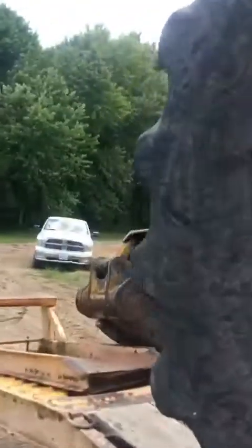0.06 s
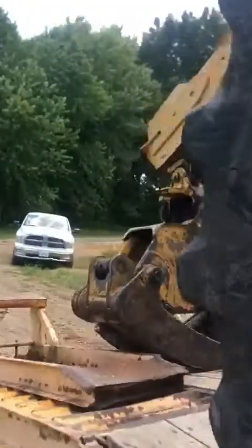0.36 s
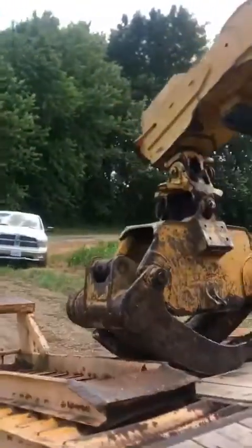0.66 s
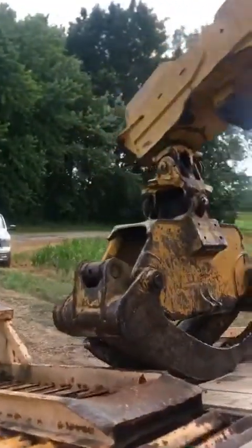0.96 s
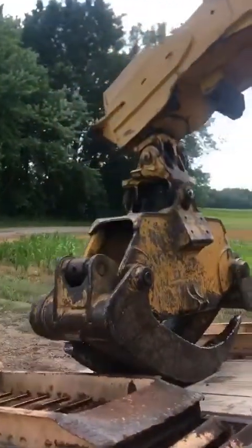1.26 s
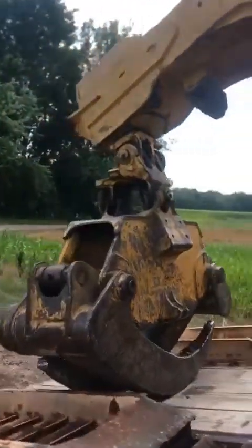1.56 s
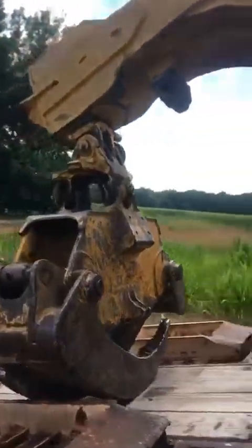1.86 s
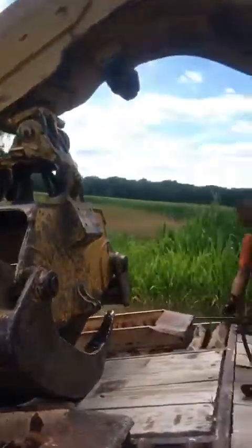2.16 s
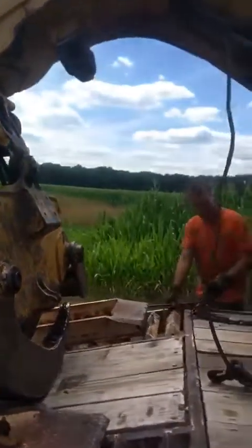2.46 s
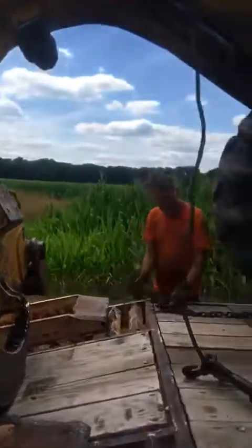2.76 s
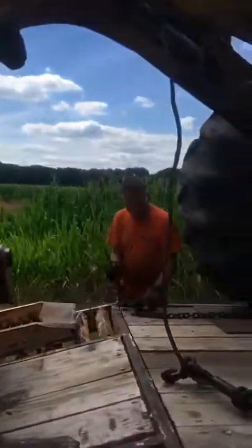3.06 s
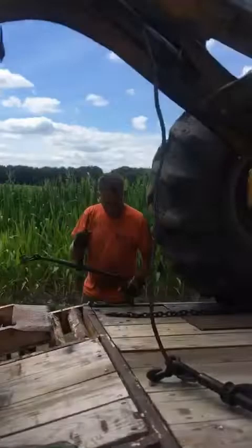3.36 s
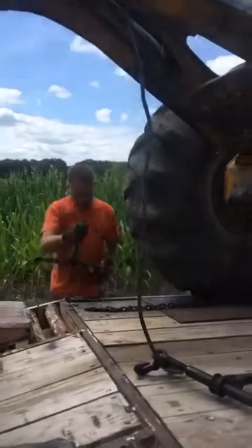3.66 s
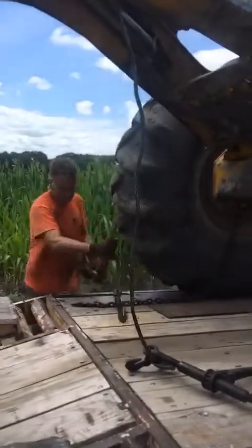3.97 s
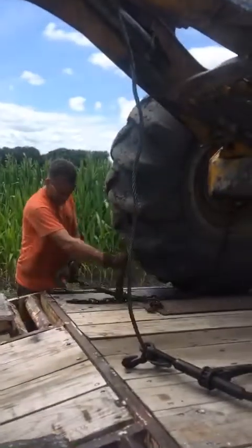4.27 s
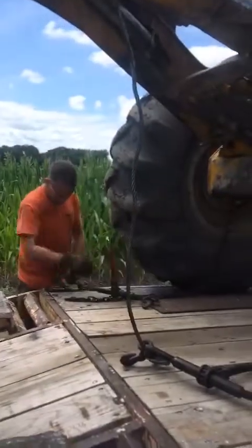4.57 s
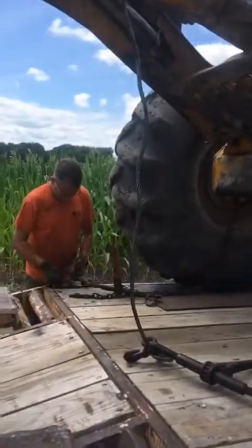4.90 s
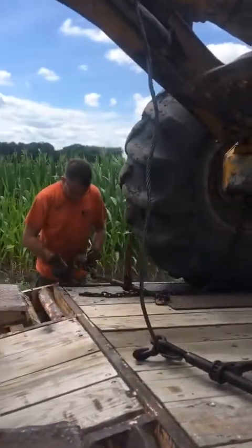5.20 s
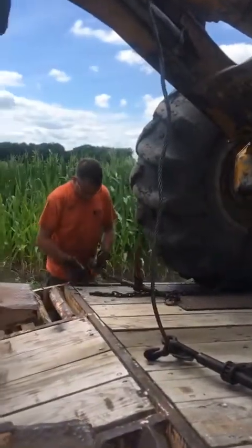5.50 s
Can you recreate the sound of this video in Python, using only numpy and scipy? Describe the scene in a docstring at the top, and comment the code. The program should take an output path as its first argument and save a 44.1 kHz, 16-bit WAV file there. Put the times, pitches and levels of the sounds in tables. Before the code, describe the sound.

A steel chain scrapes in short tugs across a steel-framed wooden trailer deck, with light clinks and knocks. After a sharper clank and a faint bird twitter, heavy clanks and bright link pings follow as wind buffets the microphone harder. Near the end a chain binder lands and rings. Leaves hiss softly outdoors, and cloth rustles briefly close by.

```python
"""Outdoors, over a hiss of leaves, a breeze rumbles at the microphone and a steel chain starts to scrape
across a steel-framed wooden trailer deck by stick-slip friction. Blows clank through the frame, rubs boom
in the planks, single links ping in their free modes, and cloth rustles close by. From about 3.5 s a small
bird twitters far off; then the gusts buffet harder and the heaviest blows fall. Near 5.5 s the chain
binder lands and rings."""
import sys
import numpy as np
from scipy import signal
from scipy.fft import rfft, irfft
from scipy.io import wavfile
from scipy.ndimage import uniform_filter1d

SR = 44100
rng = np.random.default_rng(int(sys.argv[2]) if len(sys.argv) > 2 else 0)


def waveform_to_disk(signal):
    """Save audio, clipped to [-1, 1], as 16-bit WAV at the path in sys.argv[1]."""
    frames = np.transpose(np.atleast_2d(signal))
    scaled = np.clip(frames, -1, 1) * 32767
    samples = np.round(scaled).astype(np.int16)
    wavfile.write(sys.argv[1], SR, samples)


N = 248724
TIME = np.arange(N) / SR


def amp(db):
    """Amplitude ratio of a level in decibels."""
    return 10 ** (np.asarray(db) / 20)


def unit(x):
    """Normalisation to rms 1."""
    return x / np.sqrt(np.mean(x ** 2) + 1e-20)


def read(points, hz):
    """Interpolation on a logarithmic frequency axis."""
    f, value = np.transpose(points)
    return np.interp(np.log(hz + 1), np.log(f + 1), value)


def add(mix, s, sound):
    """Superposition of a sound starting at time s."""
    part = mix[max(round(s * SR), 0):][:len(sound)]
    part += sound[:len(part)]


def colour(x, spectrum):
    """Zero-phase filtering by a table of f/Hz, gain/dB."""
    return irfft(rfft(x) * amp(read(spectrum, np.fft.rfftfreq(len(x), 1 / SR))), len(x))


def wander(rate_hz):
    """Slow random modulation: low-pass noise of rms 1."""
    hz = np.fft.rfftfreq(N, 1 / SR)
    return unit(irfft(rfft(rng.standard_normal(N)) / (1 + (hz / rate_hz) ** 4), N))


def smooth_noise(count, span):
    """Noise of rms 1, correlated over span points by a moving average."""
    return unit(uniform_filter1d(rng.standard_normal(count), size=span))


def swells(rows):
    """Raised-cosine envelopes; incoherent sources add in power."""
    return np.sqrt(sum((amp(db) * np.cos(np.pi * np.clip((TIME - s) / length, -.5, .5)) ** 2) ** 2
                       for s, length, db in rows))


def ring(modes, t, weight_db=0):
    """Free vibration: a sum of damped normal modes, with unit initial power."""
    hz, db, t60 = np.transpose(modes)[:, :, None]
    size = amp(db + weight_db)
    waves = size * np.sin(2 * np.pi * (hz * t + rng.random(hz.shape))) * np.exp(-np.log(1000) * t / t60)
    return waves.sum(0) / np.sqrt(np.sum(size ** 2) / 2)


def grains(per_s, spread_db):
    """Shot noise: a Poisson train of tiny contacts, a few much larger than the rest."""
    size = amp(spread_db * np.minimum(rng.exponential(1, N), 4))
    return unit(size * rng.choice([-1, 1], N) * (rng.random(N) < per_s / SR))


# spectrum of distant foliage: f/Hz, density/dB
FOLIAGE_SPECTRUM = [(59, -34), (100, -4), (251, -20), (426, -21), (830, -19), (915, -21), (7020, -30.5),
                    (9420, -33), (10200, -50.5), (10800, -76.5), (14000, -106), (22000, -120)]

def foliage(level_db=-56):
    """Countless distant leaves and corn stalks sum incoherently to a gently wavering hiss."""
    hiss = unit(colour(rng.standard_normal(N), FOLIAGE_SPECTRUM))
    return amp(level_db + wander(rate_hz=1.8)) * hiss


def eddies(spectrum, evenness):
    """Turbulent pressure: noise with its envelope partly levelled, so that it keeps swinging."""
    pressure = unit(colour(rng.standard_normal(N), spectrum))
    power = uniform_filter1d(abs(signal.hilbert(pressure)) ** 2, size=2200)
    return unit(pressure / power ** (evenness / 2))


# spectra of the large and of the fine eddies: f/Hz, density/dB
RUMBLE_SPECTRUM = [(15, -40), (28, -25), (42, 1), (62, 2), (90, -0.5), (130, -10.5), (200, -34.5),
                   (400, -73.5)]
FLUTTER_SPECTRUM = [(70, -6), (130, 3), (180, 1), (260, -3.5), (370, -13.5), (500, -22.5), (700, -22.5),
                    (1500, -48.5), (4000, -75.5)]
# breeze between gusts: t/s, level/dB
BREEZE_LEVELS = [(0, -47.5), (.9, -44), (1.55, -43.5), (2.05, -37.5), (2.8, -44.5), (3.8, -34),
                 (4.4, -26.5), (4.85, -25), (5.12, -32.5), (5.4, -23), (5.64, -24.5)]
# share of fine eddies in the breeze: breeze level/dB, flutter re rumble/dB
FLUTTER_SHARE = [(-49.5, -14), (-43.5, -7), (-41, -18), (-23.5, -1), (-20.5, -7.5)]
# gusts on top of the breeze: crest t/s, duration/s, level/dB, flutter re rumble/dB
WIND_GUSTS = [(.4, 0.2, -33, -17), (.66, .12, -29.5, -15), (0.838, 0.18, -31, -8.5), (1.058, 0.12, -46, 1),
              (1.201, 0.041, -34.5, -6.5), (1.792, 0.43, -32, -9), (1.944, 0.14, -29.5, -6),
              (2.15, 0.33, -36.5, -10), (2.513, 0.081, -29, -13), (2.966, 0.15, -36.5, -9),
              (3.12, 0.15, -32, -10), (3.305, 0.12, -34.5, -8), (3.432, 0.12, -27.5, -24),
              (3.608, 0.16, -31, -38), (3.823, 0.041, -22, -33), (3.891, 0.036, -23, -3),
              (4.007, 0.091, -17, -3.5), (4.082, 0.13, -17, -2.5), (4.217, 0.056, -19.5, -6.5),
              (4.303, 0.037, -21.5, 1), (4.433, 0.16, -18.5, -2), (4.511, 0.092, -23, 3.5),
              (4.614, 0.096, -18, -3.5), (4.747, 0.11, -26, -0.5), (4.842, 0.093, -23, -10),
              (5.264, 0.17, -22.5, -18.5), (5.44, 0.22, -16.5, -8)]
# sudden slaps of wind: t/s, level/dB, f/Hz
WIND_SLAPS = [(.795, -17.5, 65.4), (3.401, -20, 130), (3.941, -10, 155.4), (3.997, -7.5, 130),
              (4.483, -3.5, 270.5), (4.507, -11, 294), (4.589, -11, 251), (4.609, -12.5, 214),
              (4.727, -16, 257), (4.764, -9.5, 135.6), (4.835, -14, 127), (5.218, -12.5, 215),
              (5.374, -14.5, 252), (5.404, -10.5, 331), (5.416, -12.5, 89), (5.43, -8.5, 325)]

def wind():
    """Turbulence at the microphone: large eddies rumble, fine ones flutter, single swings slap."""
    rumble = eddies(RUMBLE_SPECTRUM, evenness=0.72)
    # fine turbulence bursts on the crests of the slow pressure swings
    bursts = amp(2 * wander(rate_hz=31) + 2 * np.clip(rumble, -2, 2))
    flutter = unit(eddies(FLUTTER_SPECTRUM, evenness=0.83) * bursts)
    breeze_db = np.interp(TIME, *np.transpose(BREEZE_LEVELS))
    breeze = amp(breeze_db + 1.5 * wander(rate_hz=22))
    fine_breeze = breeze * amp(np.interp(breeze_db, *np.transpose(FLUTTER_SHARE)))
    gusts = swells([(s, length, db) for s, length, db, _ in WIND_GUSTS])
    fine_gusts = swells([(s, length, db + fine_db) for s, length, db, fine_db in WIND_GUSTS])
    out = rumble * np.hypot(breeze, gusts) + flutter * np.hypot(fine_breeze, fine_gusts)
    for s, db, hz in WIND_SLAPS:
        cycles = np.arange(0, 4, hz / SR)
        puff_spectrum = [(hz, -6), (hz * 2, 0), (hz * 4, -12), (hz * 12, -45)]
        puff = unit(colour(rng.standard_normal(len(cycles)), puff_spectrum))
        envelope = (cycles / 0.63) ** 2 * np.exp(2 - 2 * cycles / 0.58)
        add(out, s, amp(db) * envelope * (np.sin(2 * np.pi * cycles) + amp(-17) * puff))
    return colour(out, [(15, -19), (24, -7), (40, 1.5)])  # the microphone sheds the deepest bass


def tugs(rows, rise_s=0.065, fade_db_per_s=115):
    """Envelope of pulled motion: a linear rise, a hold, then exponential decay to rest."""
    power = np.zeros(N)
    for s, held, db in rows:
        attack = np.clip(1 + (TIME - s) / rise_s, 0, 1)
        coasting_s = np.maximum(TIME - s - held, 0)
        power += (attack * amp(db - fade_db_per_s * coasting_s)) ** 2
    return np.sqrt(power)


# normal modes of the steel frame: f/Hz, level/dB, T60/s
FRAME_MODES = [(483, 1.5, 0.46), (558, -21.5, 0.35), (870, 2, 0.46), (1083, -12.5, 0.54), (1180, 2, 0.34),
               (1296, -2.5, 0.55), (1480, 0.5, 0.29), (1803, -2.5, 0.52), (1958, 6.5, 0.33),
               (2090, -16.5, 0.3), (2300, 5, 0.43), (2390, -11.5, 0.13), (2720, -1, 0.34),
               (2990, -3.5, 0.27), (3436, 1.5, 0.17), (3540, -1.5, 0.38), (4000, -8, 0.3), (4280, -17, .25),
               (5700, 0, 0.21), (5700, -7.5, 0.22)]

def slide(effort, surface, gain_db, frame_db=-13, links=6):
    """Stick-slip friction: each link repeats its own knock at random and faintly excites the frame."""
    out, t = np.zeros(N), np.arange(SR // 3) / SR
    pull = amp(3 * wander(rate_hz=11)) * tugs(effort)
    for _ in range(links):
        contact = rng.standard_normal(len(t)) * np.exp(-t / .004)
        knock = colour(np.roll(contact, SR // 500), surface)
        frame = ring(FRAME_MODES, t)
        response = knock / np.linalg.norm(knock) + amp(frame_db) * frame / np.linalg.norm(frame)
        out += signal.oaconvolve(grains(per_s=130, spread_db=1.5) * pull, response)[:N]
    return amp(gain_db) * out / np.sqrt(links)


# tugs and slack creep along the steel edge, then over the planks: t/s, hold/s, level/dB
EDGE_TUGS = [(.28, 0.064, -57), (.56, 0.01, -46.5), (.72, 0.018, -51.5), (.82, .1, -47.5),
             (1.06, 0.16, -51), (1.34, 0.04, -44.5), (1.48, 0.018, -51), (1.6, 0.079, -53),
             (1.73, 0.14, -45.5), (1.84, 0.0085, -38)]
EDGE_CREEP = [(.1, 2.25, -58)]
PLANK_TUGS = [(2.47, 0.018, -44), (2.62, 0.036, -50), (2.73, 0.071, -47), (2.9, 0.067, -56),
              (3.08, 0.025, -38), (3.2, 0.046, -53)]
PLANK_CREEP = [(2.57, 0.7, -54)]
# spectra of a link slipping on each surface: f/Hz, density/dB
EDGE_SPECTRUM = [(150, 13), (290, 8.5), (550, -4), (850, 2), (1100, -5.5), (1750, -3), (2600, -10.5),
                 (4000, -17.5), (6000, -20), (9500, -24), (11000, -48)]
PLANK_SPECTRUM = [(150, -9.5), (330, 8.5), (460, 0.5), (780, 2.5), (1200, -9.5), (1800, -9), (2600, -12),
                  (4000, -16), (6000, -23.5), (9500, -25), (11000, -47)]

def drag():
    """Source and filter: the surface under the dragged chain, steel and then wood, colours its friction."""
    on_steel = slide(EDGE_TUGS + EDGE_CREEP, EDGE_SPECTRUM, gain_db=2)
    on_wood = slide(PLANK_TUGS + PLANK_CREEP, PLANK_SPECTRUM, gain_db=-0.5)
    return on_steel + on_wood


# broad resonances of the deck and rails: f/Hz, bandwidth/Hz, gain/dB
DECK_RESONANCES = [(557, 79, 5.5), (1080, 260, 2), (1310, 110, -0.5), (1890, 290, 5.5), (2320, 89, 3.5),
                   (2534, 100, 6), (3120, 330, 3), (3790, 360, 6), (4170, 380, 5.5), (4450, 100, 2),
                   (5900, 1100, 5)]

def deck(x, ripple_db=3):
    """Forced response of the deck: each driving point favours some frequencies over others."""
    hz = np.fft.rfftfreq(len(x), 1 / SR)
    peaks_db = sum(db / (1 + (2 * (hz - centre) / width) ** 2) for centre, width, db in DECK_RESONANCES)
    place_db = ripple_db * smooth_noise(len(hz), span=110)
    log_gain = np.log(amp(peaks_db + place_db))
    # minimum phase: the resonances ring after the blow
    response = np.exp(np.conj(signal.hilbert(np.r_[log_gain, log_gain[-2:0:-1]])))
    return irfft(rfft(x) * response[:len(hz)], len(x))


# decay time of the whole trailer: f/Hz, T60/s
TRAILER_DECAY = [(100, 0.13), (600, 0.77), (1400, 0.93), (2800, 0.43), (5000, 0.21), (10000, 0.17)]

def trailer_tail(count):
    """Densely overlapping modes act as noise whose decay rate depends on frequency."""
    hz, t, bands = signal.stft(rng.standard_normal(count), SR, nperseg=256)
    decay = np.exp(-np.log(1000) * t / read(TRAILER_DECAY, hz)[:, None])
    return signal.istft(bands * decay, SR, nperseg=256)[1][:count]


# spectrum of a blow: f/Hz, density/dB
BLOW_SPECTRUM = [(60, -5.5), (200, 1.5), (600, 5.5), (1300, 6), (1700, -0.5), (2700, 1.5), (4000, -4.5),
                 (6000, -5), (7500, -5.5), (9700, -15.5), (11000, -41)]

def clank(treble_db, thud_db, chatter_t60, ring_db, crack_s=0.0019, rise_s=0.003):
    """Impact excitation: a hard crack and a chatter of settling links, with the trailer ringing on."""
    t = np.arange(2 ** 15) / SR
    crack = np.exp(-t / crack_s)
    chatter = np.exp(-np.log(1000) * t / chatter_t60)
    contact = rng.standard_normal(len(t)) * (crack + chatter)
    blow = deck(colour(contact + amp(ring_db) * trailer_tail(len(t)), BLOW_SPECTRUM))
    onset_rms = np.sqrt(np.mean(blow[:SR // 70] ** 2))
    frame = ring(FRAME_MODES, t, weight_db=7 * rng.standard_normal((len(FRAME_MODES), 1)))
    # steel on steel is bright, steel on wood is dull
    hardness = [(500, thud_db), (1600, 0.013), (3200, 0.018), (7000, 1.05 * treble_db), (10000, treble_db)]
    sound = colour(blow / onset_rms + amp(ring_db - 3) * frame, hardness)
    return sound * np.minimum(t / rise_s, 1) * (1 - t / t[-1])


# blows on the trailer: t/s, level/dB, treble/dB, plank thud/dB, chatter T60/s, ring/dB
CHAIN_BLOWS = [(.265, -48, 5, 8, 0.13, -7), (.713, -38, -28, -5, 0.098, -5.5),
               (.799, -35.5, 2, 4, 0.065, -13), (1.033, -29.5, -11, -1, 0.19, -3.5),
               (1.33, -36.5, 5, 1, 0.78, 0), (1.472, -27, -14, -9.5, 0.24, -12),
               (1.735, -30, -12, -33, .1, -9), (1.851, -22, -11, -2.5, 0.22, -12),
               (2.047, -38, 5, 5.5, 0.11, -14), (2.384, -36.5, -9, -10, 0.043, -20),
               (2.459, -32, -12, 2.5, 0.25, -7), (2.73, -33.5, -26, 8.5, 0.11, -11),
               (2.908, -36, -9, 11.5, 0.17, -17), (3.057, -29.5, -14, -26, 1, -15),
               (3.097, -15.5, 0.5, -33, 0.11, -25), (3.317, -31, 12.5, -34, 0.049, -10.5),
               (3.386, -41, 2.5, -10, 0.5, -9), (3.425, -46, -8, 11, 0.26, -23),
               (3.906, -39, 9, 3, 0.083, -8), (3.951, -31, 5.5, -3, 0.13, -13.5),
               (4.078, -28.5, 22, 22, 0.19, -6.5), (4.134, -22.5, 8, 1.5, 0.084, -30),
               (4.254, -6, 0, -2, 0.28, -7), (4.265, -4, -16, 1, .14, -13.5),
               (4.291, -6.5, -7, -4.5, .34, -11), (4.325, .5, 0.5, -2, .11, -31),
               (4.418, -14, -10, -6, 0.089, -29), (4.425, -13, -4.5, -1, 0.066, -33),
               (4.451, -19.5, -23, 3, 0.079, -21), (4.552, -27, -28, 1, 0.06, -27),
               (4.761, -26.5, -11, 4, .11, -7.5), (4.791, -31.5, -31, 11.5, 0.22, -6),
               (4.844, -21, -11.5, 9, 0.12, -24), (4.934, -19.5, -4.5, -17, 0.29, 1),
               (4.955, -13, -15.5, -9.5, 0.27, -2), (5.135, -30.5, -36.5, 8.5, 0.16, -15),
               (5.165, -9, -15.5, -4, 0.088, -16), (5.458, -9, 5.5, -7, .17, -9),
               (5.464, -0.5, 4, -12, 0.38, -8), (5.491, -16.5, 4, -6, 0.029, 0.5)]

def clanks(gain_db=-8):
    """Chain and hook strike the trailer, and the responses superpose linearly."""
    out = np.zeros(N)
    for s, db, *touch in CHAIN_BLOWS:
        add(out, s - .001, amp(db + gain_db) * clank(*touch))
    return out


# dull rubs on the planks: t/s, level/dB, f/Hz, duration/s
PLANK_SCUFFS = [(0.521, -43.5, 646, 0.078), (.556, -34.5, 347, .098), (0.89, -45.5, 1730, 0.044),
                (1.027, -43.5, 460, 0.03), (1.794, -43.5, 450, 0.21), (2.905, -44, 796, 0.049),
                (3.424, -39, 1080, .017), (3.471, -51, 1810, 0.013), (3.874, -45.5, 1500, 0.038),
                (3.926, -41, 1400, 0.014), (4.073, -19.5, 755, .034), (4.438, -29.5, 630, 0.073),
                (4.671, -50, 1870, 0.076), (5.373, -37.5, 1300, 0.15)]

def scuffs():
    """Friction noise, band-limited by the resonance of the planks, booms briefly."""
    out = np.zeros(N)
    for s, db, hz, length in PLANK_SCUFFS:
        progress = np.linspace(0, 1, int(length * SR))
        band = [(hz / 3, -22), (hz * 0.84, 0), (hz * 0.96, -1), (hz * 3, -24), (hz * 10, -55)]
        rub = unit(colour(rng.standard_normal(len(progress)), band))
        add(out, s, amp(db) * rub * np.sin(np.pi * np.sqrt(progress)))
    return out


def struck_steel(hits, modes, others_db, focus_hz, damping_per_s, rattle_db):
    """Selective excitation: modes near one pitch ring most; touching steel damps and shakes them."""
    out, t = np.zeros(N), np.arange(SR * 3 // 4) / SR
    mode_hz = np.array(modes)[:, :1]
    attack = np.minimum(t / 0.00076, 1)
    for s, db, hz, freedom in hits:
        weight_db = others_db * (1 - np.exp(-((mode_hz - hz) / focus_hz) ** 2))
        damping = np.exp(-damping_per_s * t * (1 / np.clip(freedom, .1, 1.4) - 1))
        rattle = amp(rattle_db * smooth_noise(len(t), span=260))
        tick = amp(-24) * rng.standard_normal(len(t)) * np.exp(-t / 0.00098)
        add(out, s, amp(db) * (ring(modes, t, weight_db) * damping * rattle * attack + tick))
    return out


# normal modes of the chain links: f/Hz, level/dB, T60/s
LINK_MODES = [(4420, -14.5, 0.2), (5270, -1.5, 0.15), (5326, 4, 0.38), (6020, -11, .15), (6570, -10, .19),
              (6935, 7, 0.18), (7067, 5, 0.14), (7262, -10, 0.27), (7570, -4, 0.12), (7730, 1, 0.062),
              (8200, -22, .25)]
# link striking link: t/s, level/dB, favoured f/Hz, freedom (1 rings freely, less dies sooner)
LINK_HITS = [(.714, -46.5, 5420, 0.39), (.788, -34, 6980, 1.75), (.797, -35.5, 7560, 0.95),
             (.858, -43, 5200, .3), (1.103, -34.5, 5380, .25), (1.348, -38.5, 7260, 0.14),
             (1.66, -40.5, 5380, 0.26), (1.737, -40, 7330, 0.17), (1.791, -45.5, 7000, 1.1),
             (1.854, -32, 5270, 0.55), (1.855, -32, 7200, 0.28), (2.048, -36.5, 7020, 0.7),
             (3.07, -38.5, 6850, 0.89), (3.104, -19.5, 7260, 0.18), (3.225, -52, 5320, .3),
             (3.318, -39, 7030, .7), (3.906, -35, 5190, 0.28), (4.081, -7.5, 7260, 0.66),
             (4.083, -22, 5490, 0.59), (4.104, -9.5, 7110, 0.76), (4.105, -31.5, 4400, 1.1),
             (4.082, -17, 7640, 0.83), (4.128, -11, 7260, 0.32), (4.14, -20, 5240, 0.51),
             (4.256, -13.5, 5250, .48), (4.258, -18, 7600, 0.74), (4.326, -21, 7350, 0.47),
             (4.353, -14, 7120, 0.45), (4.428, -33, 7500, 0.49), (4.79, -50, 7010, 1.5)]

def link_pings():
    """Small, stiff links collide and ring at high natural frequencies."""
    return struck_steel(LINK_HITS, LINK_MODES, others_db=-26.5, focus_hz=90,
                        damping_per_s=31.8, rattle_db=0.64)


# square blows on the frame: t/s, level/dB, favoured f/Hz, freedom (1 rings freely)
FRAME_HITS = [(.895, -38.5, 1810, 0.18), (1.855, -35.5, 1500, 0.8), (1.856, -38, 900, 0.84),
              (3.098, -35, 3540, .2), (3.101, -36, 2620, 0.52), (3.319, -40, 2262, 0.086),
              (3.319, -47, 5700, .45), (4.956, -31, 2720, 0.5), (4.957, -28.5, 1280, 0.94),
              (5.465, -21, 1310, 0.76)]

def frame_tones():
    """A square blow sets the larger frame singing at its lower natural frequencies."""
    return struck_steel(FRAME_HITS, FRAME_MODES, others_db=-16, focus_hz=150,
                        damping_per_s=13, rattle_db=1)


# spectrum of rubbing cloth: f/Hz, density/dB
CLOTH_SPECTRUM = [(880, -31), (1500, -9.5), (3130, -4), (4210, -1.5), (4540, -1), (8790, -1), (10200, -8),
                  (10800, -56), (14000, -68), (22000, -120)]
# strokes of cloth near the microphone: centre t/s, duration/s, level/dB
CLOTH_STROKES = [(.895, 0.097, -57.5), (1.058, 0.051, -44.5), (1.165, 0.14, -42), (1.18, 0.4, -50),
                 (1.56, 0.11, -49), (2.48, 0.35, -62), (2.72, 0.095, -62), (3.91, 0.17, -52),
                 (3.955, .02, -48), (4.0, 0.22, -63)]

def rustle(gain_db=6):
    """Friction between fibres makes dense shot noise that swells with each stroke."""
    slips = grains(per_s=6200, spread_db=3) * amp(2 * wander(rate_hz=28))
    return amp(gain_db) * unit(colour(slips, CLOTH_SPECTRUM)) * swells(CLOTH_STROKES)


# falling whistles that open the song: t/s, duration/s, start f/Hz, end f/Hz, level/dB, blur/Hz
BIRD_WHISTLES = [(3.465, .055, 5330, 4940, -48, 400), (3.51, .06, 4740, 4550, -46.5, 200)]
# a chip, a slur and a low note: delay/s, duration/s, start f/Hz, end f/Hz, level/dB, blur/Hz
BIRD_PHRASE = [(0, 0.039, 6200, 8000, -1, 600), (0.008, .074, 6100, 4340, -1, 900),
               (0.059, .065, 3950, 4300, 2, 200)]
# entries of that phrase: t/s, level/dB
PHRASE_ENTRIES = [(3.667, -44.5), (3.78, -42)]

def bird(gain_db=-4):
    """Gliding tones from the field; scattering by the corn spreads each into a narrow band."""
    out = np.zeros(N)
    notes = BIRD_WHISTLES + [(s + delay, length, start_hz, end_hz, db + note_db, blur_hz)
                             for s, db in PHRASE_ENTRIES
                             for delay, length, start_hz, end_hz, note_db, blur_hz in BIRD_PHRASE]
    for s, length, start_hz, end_hz, db, blur_hz in notes:
        count = int(length * SR)
        blur = unit(signal.oaconvolve(rng.standard_normal(count), np.hanning(int(SR / blur_hz)), "same"))
        glide = np.sin(2 * np.pi * np.cumsum(np.linspace(start_hz, end_hz, count)) / SR)
        add(out, s, amp(db + gain_db) * np.hanning(count) * blur * glide)
    return out


# normal modes of the chain binder: f/Hz, level/dB, T60/s
BINDER_MODES = [(1345, -22, 0.75), (2040, -15, 0.39), (2615, -9.5, 0.96), (2680, 2, 0.22),
                (2940, -3.5, 0.36), (3070, 13, 0.063), (4540, -11, 0.57), (6530, 1, 0.13),
                (8183, -11, 0.48)]
# its landing: t/s, level/dB
BINDER_LANDING = [(5.463, -7)]

def binder(rise_s=0.0019):
    """The chain binder lands and rings in free, inharmonic vibration."""
    out, t = np.zeros(N), np.arange(SR) / SR
    for s, db in BINDER_LANDING:
        add(out, s, amp(db) * ring(BINDER_MODES, t) * np.minimum(t / rise_s, 1))
    return out


def scene():
    """Superposition of all sources at a single microphone."""
    return (foliage() + wind() + drag() + clanks() + scuffs() + link_pings() + frame_tones()
            + rustle() + bird() + binder())[None]


def record(dry, ceiling=.82, cutoff_hz=10450):
    """Soft saturation rounds the loudest peaks; a low-pass filter then limits the band."""
    rounded = dry / (1 + (dry / ceiling) ** 6) ** (1 / 6)
    lowpass = signal.firwin(255, cutoff_hz, window=("kaiser", 9), fs=SR)
    return signal.oaconvolve(rounded, lowpass[None], "same")


dry = scene()
out = record(dry)
waveform_to_disk(out)
```